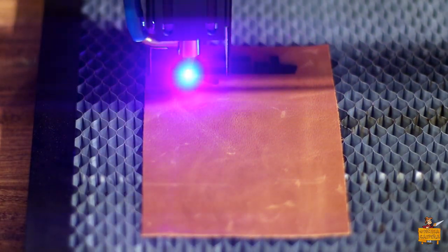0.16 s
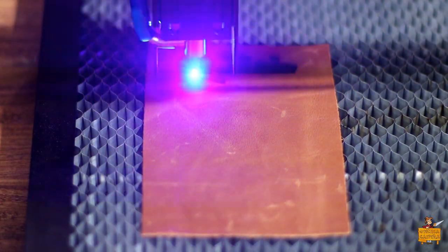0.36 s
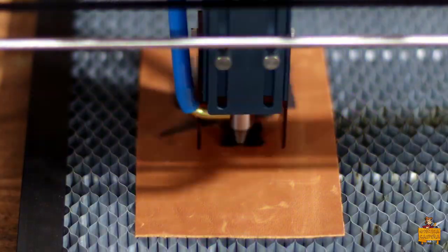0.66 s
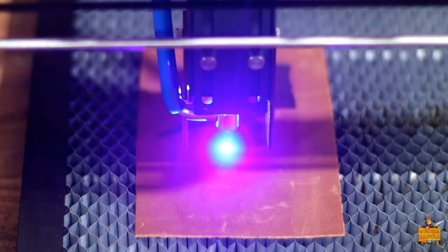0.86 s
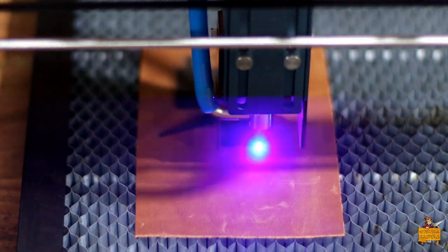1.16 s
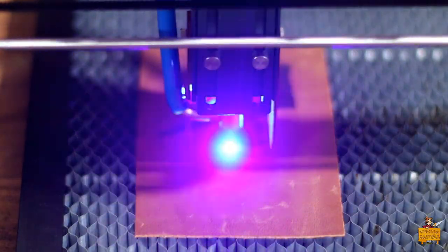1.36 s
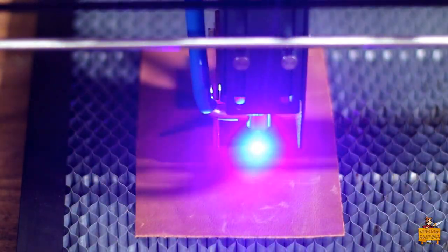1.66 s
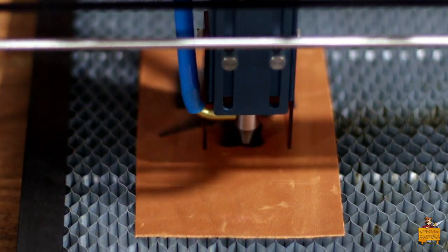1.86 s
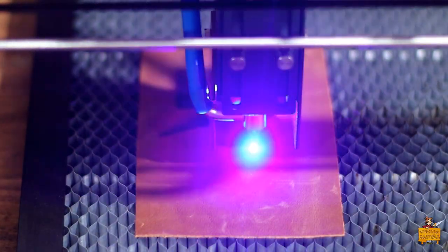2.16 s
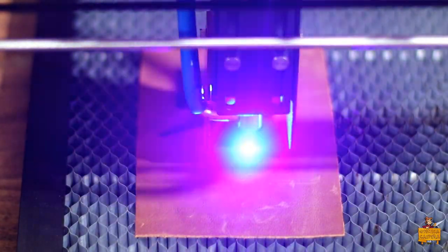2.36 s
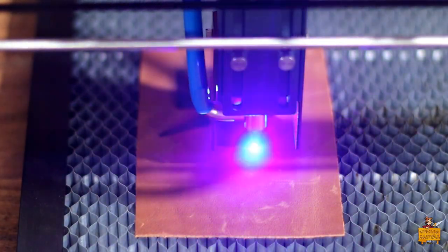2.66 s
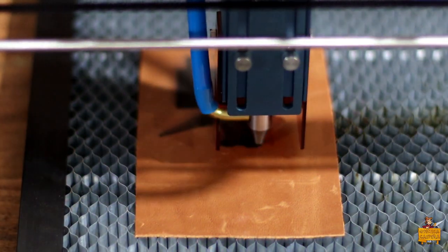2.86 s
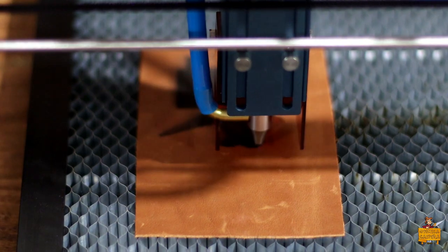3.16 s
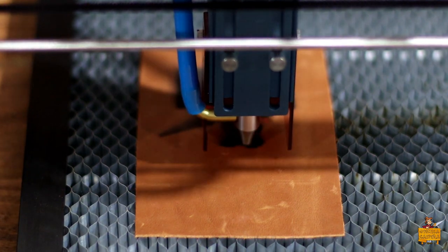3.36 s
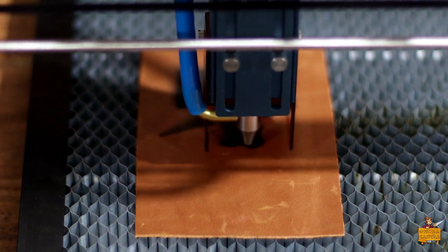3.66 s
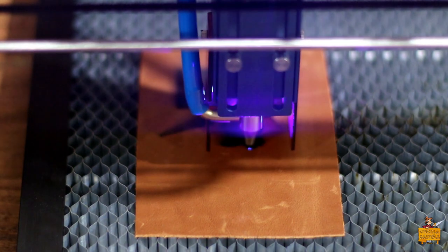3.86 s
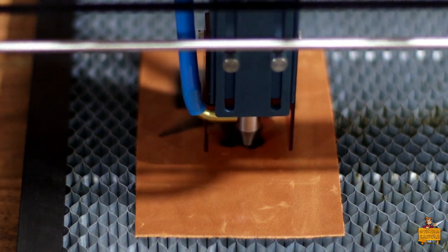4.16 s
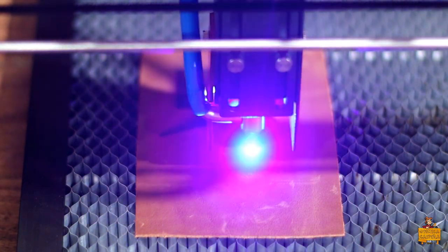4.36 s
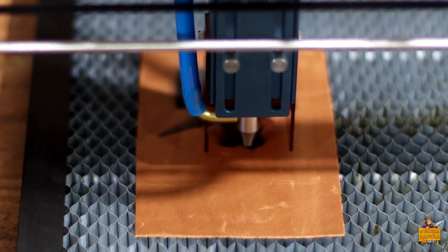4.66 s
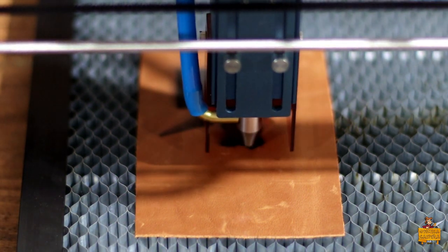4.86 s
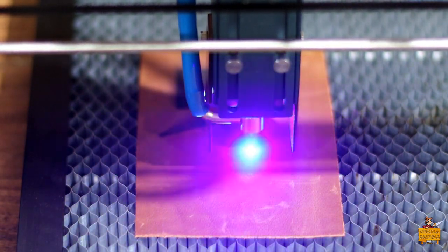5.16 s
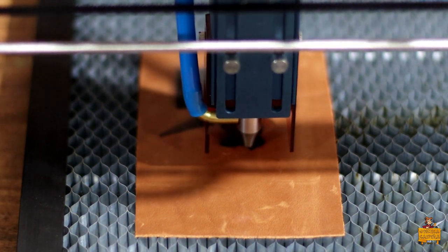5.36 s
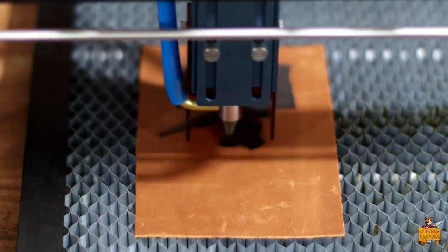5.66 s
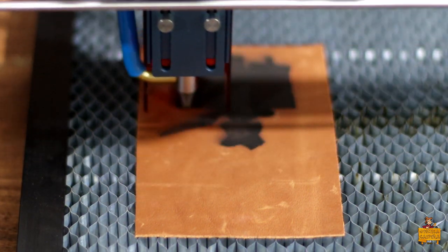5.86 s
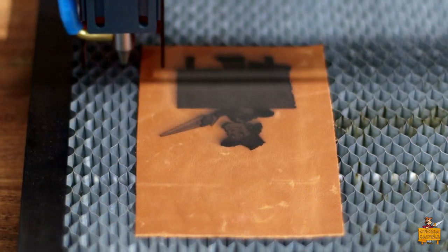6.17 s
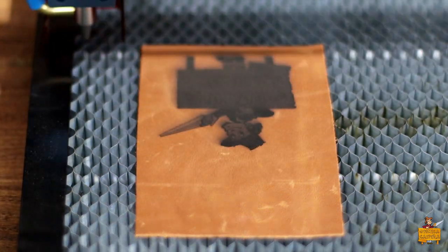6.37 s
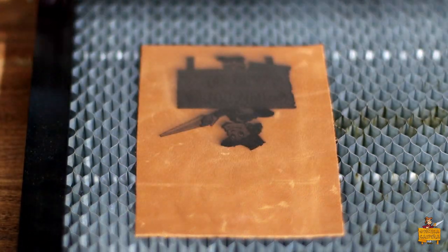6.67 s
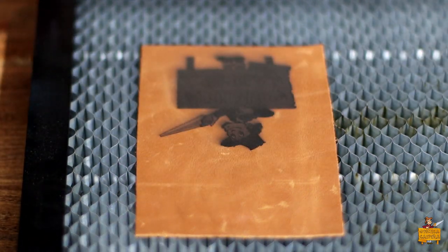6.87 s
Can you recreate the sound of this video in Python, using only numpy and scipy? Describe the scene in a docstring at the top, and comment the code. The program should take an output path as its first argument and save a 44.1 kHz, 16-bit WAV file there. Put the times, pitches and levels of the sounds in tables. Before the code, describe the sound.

A laser engraving machine heard very close in stereo. Steady fan rush, a low pump hum and a wavering blade tone run throughout. Over them the laser driver buzzes in ragged, bright bursts, irregular at first, then regular and ever shorter. Soft knocks come early and late. After the last faint tick of buzz, air sputters and hisses over a metal honeycomb bed, leaving the fans.

```python
"""A laser engraver burns a picture into leather line by line, heard on two microphone ports close by.
The driver whines on even current pulses or rings raggedly in shaded parts, in ever shorter bursts.
Around it an air pump hums on harmonics of its stroke, and fans give blade tones, rush and bearing whistle.
The opening has its own colour: duller fans, a low rumble and a different laser buzz. Damped resonances
give soft knocks; at the end the air nozzle leaves the leather and its noise hisses over the honeycomb bed."""
import sys
import numpy as np
from scipy import signal
from scipy.fft import rfft, irfft
from scipy.io import wavfile
from scipy.ndimage import uniform_filter1d

SR = 44100
rng = np.random.default_rng(int(sys.argv[2]) if len(sys.argv) > 2 else 0)


def digitize_waveform(pressure):
    """Quantize a signal to 16-bit integers and store it at the path in sys.argv[1].

    Rows of a 2-D input are taken as channels; values are limited to [-1, 1].
    """
    field = np.atleast_2d(pressure).T
    bounded = np.clip(field, -1, 1)
    quanta = np.round(bounded * 32767).astype(np.int16)
    wavfile.write(sys.argv[1], SR, quanta)


N = 310023
TIME = np.arange(N) / SR
FREQS = np.maximum(np.fft.rfftfreq(N, 1 / SR), 1)
OPENING_S = .585  # length of the opening, which has its own rumble and laser buzz

# balance between the two microphone ports: frequency_hz, left_over_right_db
PORT_LEAN = [(60, -0.5), (80, 1), (110, -6), (140, -7), (190, -4), (260, 2), (340, -2), (460, -1.5),
             (610, -0.5), (820, -0.5), (1100, -0.5), (1470, -2), (1960, -0.5), (2620, -5.5), (3510, -0.5),
             (4690, 1.5), (6270, 0), (8390, 3.5), (11200, -2.5), (15000, -4)]
# phase between the two microphone ports: frequency_hz, left_lead_rad
PORT_LEAD = [(60, 0), (2000, -.2), (3400, 0), (4800, -.4), (6500, -1), (7750, -1.8), (8400, -1.3),
             (10200, -2.9), (11700, -2.3), (13200, -3.4), (14800, -4.1)]


def from_db(db):
    """Decibels to gain."""
    return 10 ** (np.asarray(db) / 20)


def rms_one(x):
    """Scale to rms 1."""
    return x / np.sqrt(np.mean(x ** 2) + 1e-20)


def in_time(rows):
    """Each column of a curve at every sample, given rows that begin with a time in s."""
    seconds, *columns = np.transpose(rows)
    return [np.interp(TIME, seconds, column) for column in columns]


def at_hz(points, hz=FREQS):
    """Read a spectrum on a log-frequency axis."""
    point_hz, value = np.transpose(points)
    return np.interp(np.log(hz), np.log(point_hz), value)


def drift(rate):
    """Smooth chance of rms 1 that changes about rate times a second."""
    knots = rng.standard_normal(N // 40)
    return rms_one(np.interp(TIME * rate, np.arange(len(knots)), knots))


def pan(lean_db):
    """Left and right gains of constant total power."""
    gains = np.array([from_db(lean_db / 2), from_db(-lean_db / 2)]).reshape(2, -1)
    return gains / np.sqrt(np.mean(gains ** 2, axis=0))


def hump(hz, centre_hz, width_hz):
    """Gain of a resonance: 1 on top, a third at one width to either side."""
    return 1 / (1 + ((hz - centre_hz) / width_hz) ** 2 * 2)


def humps(rows):
    """Gain per root Hz of a set of resonances, added as powers."""
    return np.sqrt(sum((from_db(db) * hump(FREQS, hz, width)) ** 2 for hz, width, db in rows))


def resonate(x, hz, width_hz):
    """Two-pole resonance, gain 1 on top."""
    radius = np.exp(-np.pi * width_hz / SR)
    forward = np.array([1, 0, -1]) * (1 - radius * radius) / 2
    feedback = [1, -2 * radius * np.cos(2 * np.pi * hz / SR), radius * radius]
    return signal.lfilter(forward, feedback, x + 1e-18)


def port_turn():
    """Phase turns that split the lead evenly between the left and right spectra."""
    return np.exp(.5j * at_hz(PORT_LEAD) * np.array([[1], [-1]]))


def air(gain):
    """Turbulence with the given gain per root Hz, partly alike at the two ports."""
    # likeness of the ports: frequency_hz, shared_power (0-1)
    likeness = [(30, .7), (70, 1), (130, 0.5), (640, 0.86), (1400, 0.41), (3100, 0.57), (7000, 0.55),
                (15000, 0.12)]
    shared, *own = rfft(rng.standard_normal((3, N)))
    alike = np.clip(at_hz(likeness), 0, 1)
    ports = np.sqrt(alike) * shared * port_turn() + np.sqrt(1 - alike) * np.array(own)
    return irfft(ports * pan(at_hz(PORT_LEAN)) * gain, N) * np.sqrt(SR / 2)


def tone(turns, lead):
    """A sine of rms 1 that reaches the left port lead radians earlier."""
    phase = 2 * np.pi * ((turns + rng.random()) % 1)
    return np.sqrt(2) * np.sin(np.array([phase, phase - lead], dtype=np.float32))


def opening_rumble():
    """A faint low rumble of noise near 76 Hz under the opening, fading over 50 ms."""
    # resonance of the rumble: centre_hz, width_hz, level_db (per Hz)
    rumble = (76, 18, -72)
    opening = uniform_filter1d((TIME < OPENING_S).astype(float), SR // 20)
    return air(humps([rumble])) * opening


def pump():
    """The diaphragm hums on harmonics and the half of a nearly constant stroke rate."""
    # partials of the air pump: stroke_multiple, rms_db, left_lead_rad
    partials = [(.5, -68, 0), (1, -45.5, 0.015), (2, -51, -0.082), (3, -64, -0.32), (6, -53.5, -0.054),
                (7, -55.5, 0.53), (8, -64.5, 0.065)]
    stroke_hz, wander = 144.05, 0.0008  # wander: rms share of the rate
    turns = np.cumsum(stroke_hz * (1 + wander * drift(2.91))) / SR
    return sum(from_db(db) * tone(multiple * turns, lead) for multiple, db, lead in partials)


def fan_rush():
    """Broad air noise, raised where the ducts resonate, and the fan that travels with the head."""
    # rush of the fans, before flutter and the scene's level: frequency_hz, level_db (per Hz)
    rush = [(25, -99), (50, -92), (75, -82), (110, -79.5), (210, -81), (460, -78), (620, -75.5),
            (780, -68.5), (1100, -73.5), (2000, -68), (3300, -73), (3900, -71.5), (8800, -68.5),
            (10300, -78.5), (16000, -83.5)]
    # resonances of ducts and cooling fins, before the same: centre_hz, width_hz, level_db (per Hz)
    ducts = [(1624, 270, -64.5), (2395, 52, -64), (11330, 850, -73.5), (13570, 950, -72)]
    # fan on the laser head, before its fade and the same: centre_hz, width_hz, level_db (per Hz)
    head_fan = [(1220, 260, -77.5), (3176, 840, -69.5), (5900, 2600, -88)]
    # head fan's change of level, fading as the head leaves: time_s, extra_db
    head_fade = [(0, 1), (.6, -0.5), (2, 0), (4, 1.5), (5.6, 1.5), (6.4, -2.5), (6.65, -12), (7.03, -21)]
    flutter_db = 0.8
    broad = air(np.hypot(from_db(at_hz(rush)), humps(ducts)))
    head = air(humps(head_fan)) * from_db(in_time(head_fade)[0])
    return (broad + head) * from_db(flutter_db * drift(40))


def sing_level():
    """Level of the strongest fan tone in dB before its trim and flutter: a curve plus flat-topped swells."""
    # underlying level of the strongest fan tone: time_s, level_db
    steady = [(0, -47.5), (2.8, -45), (3.2, -42), (5.2, -41), (6.1, -45.5), (7.03, -39.5)]
    # its swells: start_s, end_s, extra_db
    swell_rows = [(1.887, 2.09, 7.9), (3.634, 4.165, 6.1), (6.54, 6.664, 6.9)]
    edge_s = 0.04
    level_db = in_time(steady)[0]
    for start, end, db in swell_rows:
        inside_s = np.minimum(TIME - start, end - TIME)
        level_db = level_db + db * np.clip(inside_s / edge_s + .5, 0, 1)
    return level_db


def fan_tones():
    """Blade tones, shaken in pitch and level by the uneven inflow."""
    # weaker fan tones: pitch_hz, rms_db, unsteadiness (0-1)
    blades = [(1377, -53, 0.61), (1510, -49.5, 0.79), (1610, -57, 0.86), (1590, -45.5, .7),
              (1623, -48.5, 0.66), (1654, -52.5, 0.81), (1734, -48, 0.78), (1780, -58, 0.82),
              (2135, -57, 0.16), (2252, -53.5, 0.22)]
    sing_hz, trim_db, flutter_db = 1477, -0.5, 2.5
    sway_hz = 11  # rms pitch sway at unsteadiness 1
    sing_turns = np.cumsum(sing_hz + 2 * drift(15)) / SR
    sing = tone(sing_turns, at_hz(PORT_LEAD, sing_hz)) * pan(at_hz(PORT_LEAN, sing_hz))
    out = from_db(sing_level() + trim_db + flutter_db * drift(14)) * sing
    for hz, db, unsteady in blades:
        turns = np.cumsum(hz + unsteady * sway_hz * drift(30)) / SR
        level = from_db(db) * (1 + unsteady * drift(25)) / np.hypot(1, unsteady)
        out = out + level * tone(turns, at_hz(PORT_LEAD, hz)) * pan(at_hz(PORT_LEAN, hz))
    return out


def bearings():
    """High orders of each rotor's turning rate sing through a resonance of its fan frame."""
    # fan rotors, before the scene's level: turns_per_s, rms_db, frame_centre_hz, frame_width_hz
    rotors = [(150, -37, 7930, 450), (156.7, -36.5, 7560, 540)]
    wander, scatter_hz = .002, 14  # rms: share of the turning rate, pitch scatter of each order
    out = 0
    for rate, db, ring_hz, width_hz in rotors:
        turns = np.cumsum(rate * (1 + wander * drift(4))) / SR
        whistle = 0
        for order in range(43, 56):
            hz = order * rate
            scatter = np.cumsum(scatter_hz * drift(90)) / SR
            gain = hump(hz, ring_hz, width_hz) * pan(at_hz(PORT_LEAN, hz))
            whistle = whistle + gain * tone(order * turns + scatter, at_hz(PORT_LEAD, hz))
        out = out + from_db(db) * rms_one(whistle)
    return out


def knocks():
    """Soft knocks, probably a hose or cable bumping: a damped thud and clack with a brief rattle behind."""
    # soft knocks: time_s, low_thud_peak_db, hollow_clack_peak_db
    knock_rows = [(1.2827, -24, -17), (1.311, -45, -21), (1.33, -36, -25), (1.357, -22.5, -38),
                  (1.365, -26, -38), (1.389, -19.5, -41), (1.515, -22.5, -26), (1.57, -29, -21),
                  (1.589, -22, -32), (6.042, -23, -14.5), (6.068, -24, -30), (6.097, -26, -38),
                  (6.126, -20.5, -30), (6.212, -20.5, -19.5), (6.246, -43, -24.5)]
    thud, clack = (245, 220), (860, 570)  # centre Hz, width Hz
    rattle_db, rattle_s = -30, 0.019  # against the first impulse; decay time
    out, age = np.zeros(N), TIME[:SR // 10]
    # soft contact passes 140-1700 Hz
    contact = signal.butter(2, [140, 1700], "band", fs=SR, output="sos")
    for s, *levels in knock_rows:
        push = from_db(rattle_db) * rng.standard_normal(len(age)) * np.exp(-age / rattle_s)
        push[0] = 1
        at = int(s * SR)
        for (hz, width), db in zip((thud, clack), levels):
            ring = signal.sosfilt(contact, resonate(push, hz, width))
            out[at:at + len(age)] += from_db(db) * ring / np.abs(ring).max()
    return out


def jet_level():
    """Level of the jet in dB: its hiss curve plus gusts that rise fast and die more slowly."""
    # air jet as the nozzle leaves the leather and moves off: time_s, level_db
    jet_curve = [(5.8, -66), (6.11, -44), (6.17, -32), (6.57, -32), (6.65, -38), (7.03, -38)]
    # gusts where the jet strikes a cell wall: peak_s, level_db
    gusts = [(6.21, -24), (6.273, -23.5), (6.328, -21), (6.358, -19.5), (6.384, -15), (6.463, -22),
             (6.517, -20), (6.547, -21), (6.735, -20)]
    attack_s, release_s = 0.016, 0.033
    power = from_db(in_time(jet_curve)[0]) ** 2
    for s, db in gusts:
        away = np.maximum((s - TIME) / attack_s, (TIME - s) / release_s)
        power = power + (from_db(db) * np.exp(-np.minimum(away, 20))) ** 2
    return 10 * np.log10(power)


def nozzle():
    """The air jet is chopped by the honeycomb's edges and sets its cells resounding."""
    # colour of the jet, before its level is set: frequency_hz, relative_db (per Hz)
    jet_colour = [(800, -20), (1500, -6), (2800, 8), (4000, 9), (6000, 5.5), (8200, 11), (10000, 10.5),
                  (11500, 9.5), (12200, 7), (12800, 12), (13900, 6), (14900, 0), (16000, -11)]
    # how hard air blown across the open cells sounds them: time_s, extra_db
    cell_blow = [(0, 0.5), (.578, -9), (.592, -16), (6.1, -3), (6.35, -0.5), (6.7, 1.5), (6.74, -3),
                 (6.79, 3.5), (7.03, 1)]
    # resonances of the cells, before the blowing level: centre_hz, width_hz, level_db (per Hz)
    cells = [(1790, 300, -65.5), (4430, 110, -63), (4760, 220, -68.5)]
    split_hz, knee_db = 6500, -27
    sputter_db = 1.2 * drift(700)
    hiss = rms_one(air(from_db(at_hz(jet_colour))))
    low = signal.sosfiltfilt(signal.butter(2, split_hz, fs=SR, output="sos"), hiss)
    # a harder jet gets brighter: above the knee its low part grows only half as fast
    blow_db = jet_level()
    low_db = np.minimum(blow_db, (blow_db + knee_db) / 2)
    jet = (low * from_db(low_db) + (hiss - low) * from_db(blow_db)) * from_db(sputter_db)
    return jet + air(humps(cells)) * from_db(in_time(cell_blow)[0])


def fill_burns():
    """Lines of a tapering shape (start_s, end_s, level_db): they come faster as they shorten; the tip is faint."""
    first_s, lines, turn_s = 2.2215, 26, .0929  # one turn of the carriage between lines
    widest_s, narrowest_s, taper_power = .0796, .0146, 1.5
    line_db, last_line_db, scatter_db = 1.9, -5, 1
    lengths = narrowest_s + (widest_s - narrowest_s) * np.linspace(1, 0, lines) ** taper_power
    ends = first_s + np.cumsum(lengths + turn_s) - turn_s
    levels = np.append(line_db + scatter_db * rng.standard_normal(lines - 1), last_line_db)
    return list(zip(ends - lengths, ends, levels))


def laser():
    """Even current pulses give a clean whine; in shading their ends scatter, so the coil rings raggedly."""
    # burns over the irregular upper part of the picture: start_s, end_s, level_db (before flicker)
    upper_burns = [(0, .294, 0.5), (.38, .487, 0.5), (.488, .58, 2.5), (.633, .727, 0.5), (.812, .857, 3.5),
                   (.957, 1.015, 2.5), (1.087, 1.175, 2), (1.266, 1.357, -0.5), (1.452, 1.478, 1),
                   (1.576, 1.588, 2.5), (1.688, 1.779, 2), (1.87, 1.953, 1.5)]
    # driver whine, before burn level and shading:
    # pulse_multiple, rms_db, left_over_right_db, left_lead_rad, extra_db (in the opening)
    partials = [(1, -51, 0, -.1, 9), (2, -42.5, -4, .4, -9), (3, -53, 0, 0, 9.5), (4, -35.7, 1, -.3, -3.8),
                (5, -38.3, 1, -1, .5), (7, -36.5, 4, -1.3, -5), (8, -38.5, 0, -2.5, -6),
                (9, -43, -4, -2.7, 2), (10, -43.5, -1.5, -2.3, -3), (11, -39.5, -2, 2.8, -9),
                (12, -40, -10, 2.2, -.5), (13, -57, -2, 0, 3)]
    # resonances of the driver's coil and housing, before burn level and shading:
    # centre_hz, width_hz (half of each pole pair's), rms_db, left_over_right_db, extra_db (in the opening)
    coil = [(1940, 270, -51.5, -3, 13), (2410, 110, -44.5, 9, -1), (3340, 320, -42.5, 0, -3),
            (4564, 130, -41, 3, 4.5), (4840, 210, -38, -9, 0), (5710, 210, -34, 3, -0.5),
            (5900, 170, -40.5, -7, -17), (8780, 570, -40, 6, -1), (9460, 190, -39, -7, -7),
            (10800, 320, -40, -7, 6), (11950, 500, -43.5, 11, 8), (13400, 410, -38.5, -4, 0),
            (14000, 430, -36.5, -23, -9)]
    pulse_hz, edge_s = 1202.1, .002
    shaded_share, outline_s = 0.57, 0.019  # half-tone share (0-1), its onset from either end of a line
    flicker_db, flicker_per_s = 1.43, 50  # the beam's power follows the light and dark of the picture
    jitter_turns = 0.0056  # rms, in pulse periods

    on, shading, opening = np.zeros(N), np.zeros(N), TIME < OPENING_S
    for start, end, db in list(upper_burns) + fill_burns():
        inside = slice(max(int(start * SR), 0), int(end * SR))
        on[inside] = from_db(db)
        # the picture has solid outlines and is shaded within
        from_edge_s = np.minimum(TIME[inside] - start, end - TIME[inside])
        shading[inside] = shaded_share * np.clip(from_edge_s / outline_s, 0, 1)
    on = uniform_filter1d(on, int(edge_s * SR) + 1) * from_db(flicker_db * drift(flicker_per_s))
    shading = np.clip(shading * (1 + drift(90) / 2), 0, 1)

    # small wavering of pulse timing blurs the high partials most
    turns = pulse_hz * TIME + jitter_turns * drift(160)
    whine = 0
    for multiple, db, lean, lead, opening_db in partials:
        whine = whine + from_db(db + opening_db * opening) * pan(lean) * tone(multiple * turns, lead)

    # in shaded parts each pulse ends at a moment of its own
    cycles = np.arange(int(N / SR * pulse_hz) - 1)
    end_cycles = cycles + rng.random(len(cycles)) * 2 / np.pi
    switch_off = np.zeros(N)
    switch_off[(end_cycles * SR / pulse_hz).astype(int)] = 1
    ragged = 0
    for hz, width, db, lean, opening_db in coil:
        ring = resonate(resonate(switch_off, hz, 2 * width), hz, 2 * width)
        ragged = ragged + from_db(db + opening_db * opening) * pan(lean) * rms_one(ring)
    ragged = irfft(rfft(ragged) * port_turn(), N)
    return on * (np.sqrt(1 - shading) * whine + np.sqrt(shading) * ragged)


def scene():
    """Rumble, pump, fans, knocks, nozzle and laser together."""
    # levels of bearing whistle and fan rush: nearly no whistle in the opening, then strong:
    # time_s, whistle_extra_db, rush_extra_db
    fan_levels = [(0, -22, 1), (.578, -22, 0), (.592, 3, 0.5), (2, 2, 0), (3.5, 3, -0.2), (5, 2.5, 0),
                  (5.8, 3, -0.35), (6.3, 2, 1), (6.6, 5, -0.5), (7.03, 1.5, 1)]
    whistle_db, rush_db = in_time(fan_levels)
    fans = from_db(rush_db) * fan_rush() + fan_tones() + from_db(whistle_db) * bearings()
    return opening_rumble() + pump() + fans + knocks() + nozzle() + laser()


def record(dry):
    """The top is cut steeply above 15650 Hz."""
    return signal.sosfilt(signal.ellip(12, .1, 90, 15650, fs=SR, output="sos"), dry)


dry = scene()
out = record(dry)
digitize_waveform(out)
```